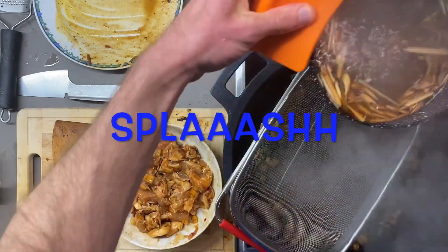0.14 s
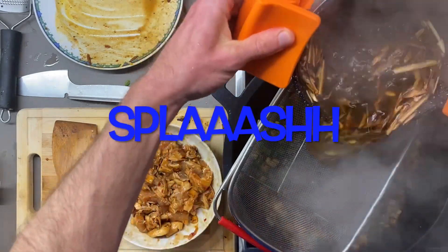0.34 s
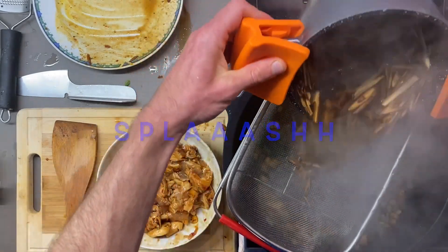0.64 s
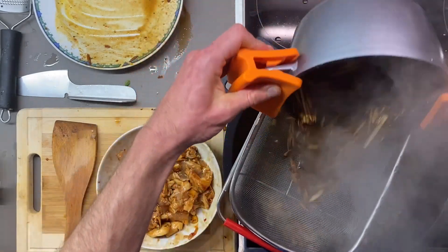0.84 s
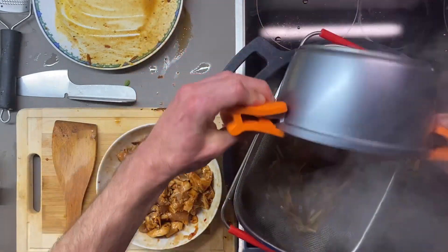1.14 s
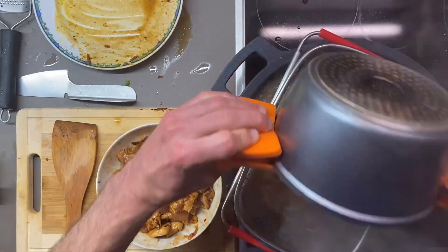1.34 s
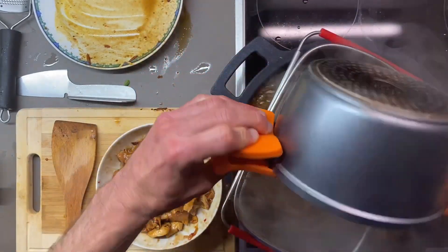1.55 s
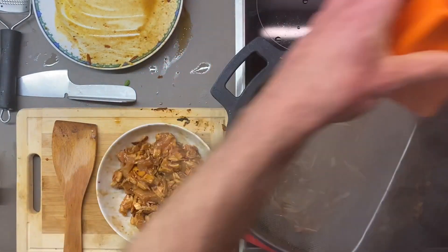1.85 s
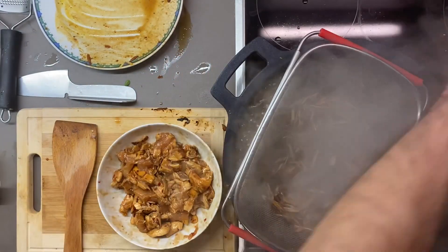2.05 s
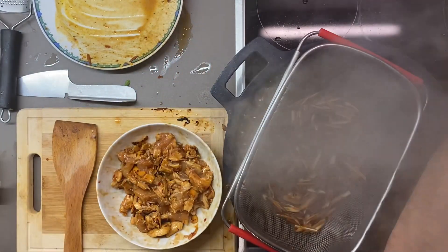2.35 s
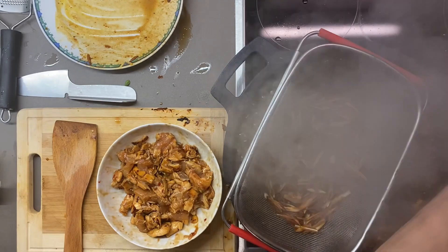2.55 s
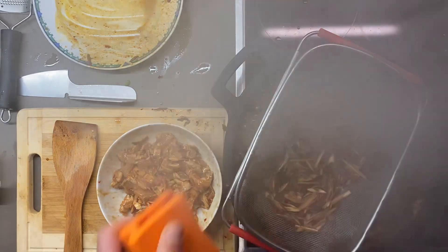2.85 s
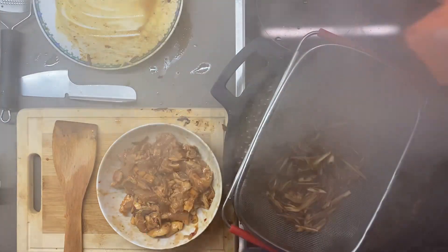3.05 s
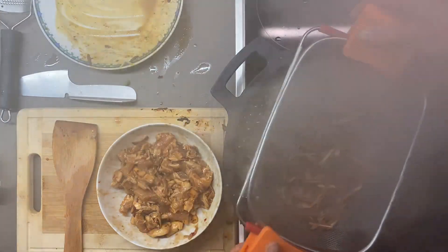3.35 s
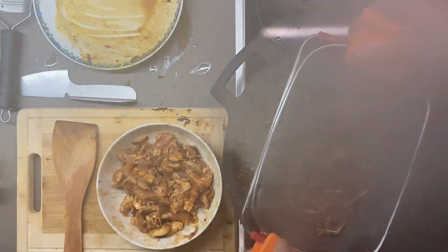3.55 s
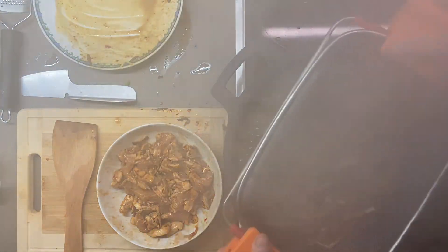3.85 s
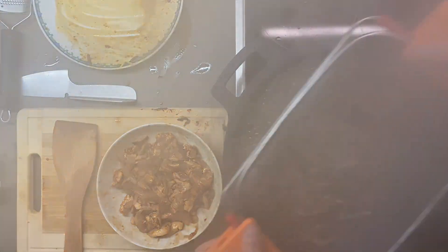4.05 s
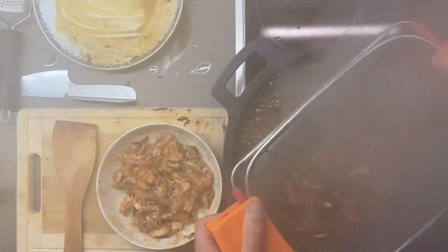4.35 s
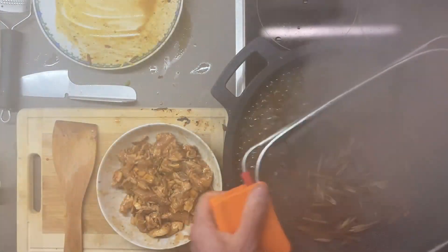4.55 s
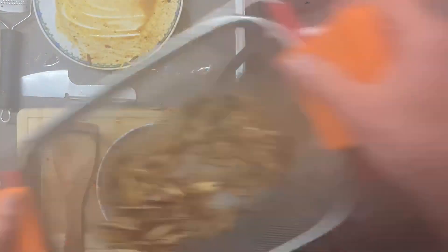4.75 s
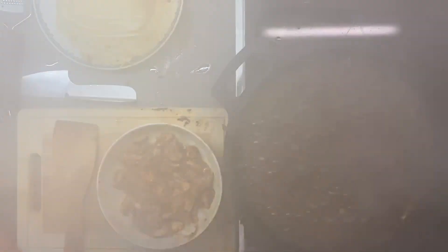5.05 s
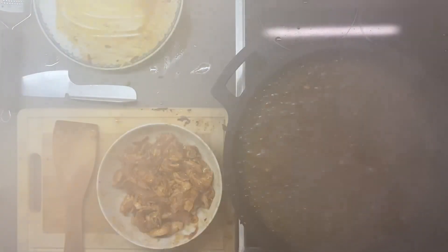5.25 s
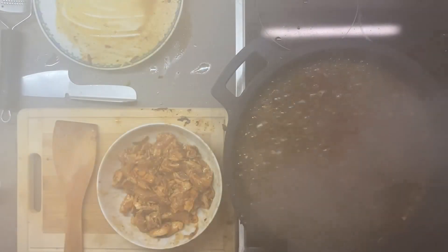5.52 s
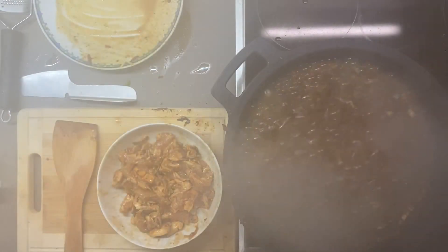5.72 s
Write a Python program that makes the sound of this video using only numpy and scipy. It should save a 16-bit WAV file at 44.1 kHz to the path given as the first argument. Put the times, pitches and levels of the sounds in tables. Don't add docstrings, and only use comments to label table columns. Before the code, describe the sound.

Loud steam hisses as hot broth pours through a strainer into a hot pan, fades to a low boil, then metal clatters on a bowl.

```python
import sys
import numpy as np
from scipy import signal
from scipy.fft import rfft, irfft, next_fast_len
from scipy.io import wavfile
from scipy.ndimage import uniform_filter1d

SR = 44100
rng = np.random.default_rng(int(sys.argv[2]) if len(sys.argv) > 2 else 0)


def undo_db(level):
    steps = np.asarray(level, float) / 20
    return 10 ** steps


def master_out(mix):
    frames = np.transpose(np.atleast_2d(mix))
    ceiling = np.clip(frames, -1, 1)
    pcm = np.round(ceiling * 32767).astype(np.int16)
    wavfile.write(sys.argv[1], SR, pcm)


N = 259352

# (time [s], level [dB])
PAN_HEAT = [(0.0, -32), (0.8, -33), (1.05, -35), (1.36, -37), (1.6, -41), (1.8, -45), (1.95, -48),
            (2.3, -50), (2.6, -49.5), (3.0, -52), (4.0, -53.5), (5.88, -51.5)]
# (frequency [Hz], density [dB per Hz])
STEAM_SPECTRUM = [(300, -14.5), (900, -18.5), (1800, -7), (3000, -3), (4200, -1), (5100, 0.5), (5800, -5),
                  (6500, -11), (7500, -6), (8700, -7), (10500, -8.5), (13500, -8), (15800, -13)]
# (frequency [Hz], density [dB per Hz])
BOIL_SPECTRUM = [(25, -40), (50, -20), (100, -5), (170, -8), (300, -3), (600, -8.5), (1000, -9), (1600, -9),
                 (2500, -12.5), (4000, -20), (8000, -53)]
# (frequency [Hz], width [Hz], gain [dB])
BODY_RESONANCES = [(86, 84, 1), (306.4, 35, -4.5), (830, 59, -3.5), (1080, 84, -5.5)]
# (frequency [Hz], width [Hz], gain [dB])
PAN_WALL_RESONANCE = (4870, 200, 20.6)
# (time [s], width [s], lift of trickle [dB], lift of boil [dB])
LAST_GUSH = (1.27, 0.45, 3.1, 1.75)
# (time [s], strength [1])
STRAINER_LANDINGS = [
    (5.24, 0.42),
    (5.5, 1.2),
    (5.67, 0.7),
    (5.83, 0.63),
]
# (time [s], peak [dB], centre [Hz])
DRIPS_AND_TICKS = [(2.511, -38, 11800), (2.759, -34.5, 2300), (2.834, -47, 9160), (2.885, -42, 4500),
                   (2.985, -49.5, 9690), (3.177, -39, 2800), (3.28, -36.5, 3470), (3.317, -44, 10300),
                   (3.348, -40, 10800), (3.697, -32.5, 1990), (3.787, -46, 10400), (3.9, -46, 3000),
                   (4.024, -30.5, 1100), (4.163, -40, 4870), (4.218, -42, 3800), (4.307, -48, 10100),
                   (4.545, -35, 1980), (4.926, -50, 9180), (5.036, -30.5, 1500), (5.144, -47, 10900),
                   (5.178, -40, 2500), (5.379, -28.5, 900), (5.396, -38, 2500), (5.416, -28.5, 1110)]
# (frequency [Hz], level [dB], t60 [s])
POT_MODES = [(382, -2, 0.056), (504, -10, 0.04), (686, -3, 0.037), (840, 0, 0.036), (1010, 2.5, 0.049),
             (1180, 0, .04), (1390, -3, .035), (1650, -2, .035), (1970, -5, .03), (2180, -12, .03),
             (4797, -13, .03)]
# (frequency [Hz], level [dB], t60 [s])
STRAINER_MODES = [(2250, -20, 0.088), (2430, -13, 0.056), (2630, 7, 0.075), (2890, 3, 0.082),
                  (3420, 4, 0.068), (3780, 0.5, .06), (4500, -12, .07), (4830, -1, 0.053), (5240, 2, 0.07),
                  (5760, -11, .06), (9000, -7, 0.044), (9900, -16, .05)]
# (frequency [Hz], level [dB], t60 [s])
BOWL_MODES = [(1890, -6.5, 0.24), (2156, -11, 0.18), (2690, -6, 0.11), (2915, -1.5, 0.08), (3050, -3, .07),
              (4005, -10, 0.066), (4360, -7, 0.077), (4620, -2, 0.073), (4700, -5, .08), (5240, -1, 0.082),
              (5180, -6, 0.073), (8130, -3, 0.084), (11200, -6, 0.055)]
# (frequency [Hz], level [dB], t60 [s])
LOADED_BOWL_MODES = [(1712, -4, 0.076), (1873, -11, 0.081), (2300, -6, 0.062), (2690, -6, 0.064),
                     (2957, 0, 0.06), (3140, 0.5, 0.076), (3900, -6, 0.08), (4250, -5, 0.072),
                     (4770, 1.5, 0.1), (5330, -6.5, 0.087), (5470, -10.5, 0.047), (8260, 1, 0.055),
                     (11300, -14, 0.044)]
# (frequency [Hz], level [dB], t60 [s])
COUNTER_MODES = [(88, -1, 0.26), (107.7, 0, 0.37), (137.8, 1.5, 0.18), (161, -6, 0.13), (197.4, -1, 0.27),
                 (226.7, -1, 0.17), (275, -6, 0.16), (353, -2.5, 0.13), (396, -6, 0.088),
                 (445, -12.5, 0.17)]
# (time [s], ring [dB], crack [dB], rattle length [s], crack tilt [dB per octave])
POT_CLASHES = [
    (2.4105, -32, -31.5, .001, -6.5),
    (2.4117, -29, -29.5, 0.0011, -6),
    (2.4135, -29.5, -29.5, .001, -7),
    (2.4155, -32, -30.5, .001, -8),
    (2.418, -29.5, -32, 0.0033, -9),
]
# (time [s], ring [dB], crack [dB], rattle length [s], crack tilt [dB per octave])
STRAINER_CLASHES = [
    (5.227, -21.5, -19, 0.016, 0.54),
    (5.239, -24.5, -28, 0.0097, .2),
]
# (time [s], ring [dB], crack [dB], rattle length [s], crack tilt [dB per octave])
BOWL_CLASHES = [
    (5.476, -23.5, -27.5, 0.022, 1.6),
    (5.514, -27, -28, 0.006, .3),
    (5.519, -21.5, -25, 0.013, .3),
    (5.531, -21, -21.5, 0.017, .3),
]
# (time [s], ring [dB], crack [dB], rattle length [s], crack tilt [dB per octave])
LOADED_BOWL_CLASHES = [
    (5.644, -35, -36, 0.025, -5),
    (5.671, -21.5, -23, 0.0092, 2),
    (5.688, -32, -23.5, 0.0115, .3),
    (5.706, -32, -29.5, 0.015, -3),
    (5.745, -41, -39, 0.015, -1),
    (5.786, -31.5, -36, .012, -6),
    (5.804, -28, -28, 0.0091, -3.5),
    (5.856, -42, -45, .012, .3),
]
# (time [s], level [dB], contact time [s])
COUNTER_THUDS = [(2.417, -18, 0.0034), (2.425, -11.5, 0.0043), (5.236, -20, 0.0044), (5.4917, -5.5, 0.0026),
                 (5.4963, -13, 0.0022), (5.503, -8, .004), (5.513, -10.5, 0.0049), (5.536, -22, .003),
                 (5.549, -20, 0.003), (5.654, -13, 0.0066), (5.666, -11.5, 0.0061), (5.677, -15.5, 0.0057),
                 (5.7, -17, 0.005), (5.714, -30, .004), (5.748, -20.5, 0.0035), (5.785, -26, 0.0042)]
# (time [s], frequency [Hz], level [dB], t60 [s])
SINGING_PARTIALS = [(2.432, 89.3, -25, 0.36), (5.5, 110, -14, 0.28), (5.5, 282, -26, 0.13),
                    (5.66, 111.8, -18, .3), (5.682, 197, -19, 0.38), (5.232, 3140, -35, .3),
                    (5.478, 4005, -20.5, .09), (5.512, 1080, -28.5, 0.39), (5.522, 754, -23.5, 0.17),
                    (5.52, 1890, -24, 0.1), (5.525, 5240, -30, 0.18), (5.674, 1650, -29, .15),
                    (5.682, 746, -25.5, 0.33), (5.69, 1067, -32.5, 0.28), (5.8, 2980, -36, .15)]
# (frequency [Hz], density [dB per Hz])
SHUDDER_SPECTRUM = [(20, -40), (30, -9), (50, 6.5), (70, 0.5), (100, 1), (140, -2.5), (200, -56),
                    (400, -60)]
# (time [s], level [dB])
WEIGHT_SHIFTS = [(.29, -54), (.83, -50), (1.3, -47), (1.65, -55), (2.13, -50), (2.45, -40), (2.77, -58),
                 (3.12, -50), (3.4, -38.5), (3.75, -48), (4.04, -49), (4.35, -44), (4.88, -51), (5.25, -38),
                 (5.55, -39), (5.82, -42)]
# (frequency [Hz], t60 [s])
KITCHEN_T60 = [(100, 0.33), (500, 0.64), (2000, 0.25), (6000, 0.33), (14000, 0.18)]
# (frequency [Hz], lead of left [rad], likeness [0-1], left minus right [dB])
PORT_PAIR = [(0, 0, 0.98, 5), (110, 0, 0.98, 0), (250, -0.34, 1, -1.4), (665, -0.5, 0.79, 1.5),
             (1700, 0.78, 0.68, -0.5), (2580, 0.7, 0.69, -1.5), (4400, 1.23, 0.9, -2),
             (5150, 0.05, 0.93, 0), (6060, 1.75, 0.5, 0), (6520, 2.5, 1, -2), (7216, 3, 0.96, -0.5),
             (10400, 6.5, .93, 0.5), (13800, 9, 1, -1), (15500, 12, 0.8, 0), (16700, 12.9, .9, 0)]
# (frequency [Hz], difference [dB])
LOST_UNDER = [(1500, 22), (2000, 15), (5500, 16), (6300, 7.5), (16000, 7.5)]


def pan():
    t = np.arange(N) / SR
    heat_db = np.interp(t, *np.transpose(PAN_HEAT))
    knee_db, share = -45, 0.56
    held_db = share * 10 * np.log10(1 + undo_db(2 * (heat_db - knee_db)))
    stir = stirring(t)
    return steam(heat_db, stir) + broth(t, heat_db, held_db, stir) + stove(t, held_db)


def steam(heat_db, stir):
    fizz = bubbles(1802, 11000, cycles=3, per_s=2393, spread_db=2, level_db=-6)
    bed = patchy_noise(1.0, 0.39, wide=6, long=10)
    sound = coloured(bed + fizz, lambda hz: read(STEAM_SPECTRUM, hz))
    hiss, top = split(evened(sound), 6500)
    hiss_db = heat_db + 3.0 + 5 * stir
    top_db = -24 + 1.263 * (heat_db + 32.5) + 12 * stir
    return hiss * undo_db(hiss_db) + top * undo_db(top_db)


def broth(t, heat_db, held_db, stir):
    gurgle = bubbles(306, 2798, cycles=5.5, per_s=700, spread_db=2, level_db=-9)
    bed = patchy_noise(1.25, 0.76, wide=3, long=12)
    body = [(hz, width, 7.5 + 0.5 * db) for hz, width, db in BODY_RESONANCES] + [PAN_WALL_RESONANCE]
    sound = coloured(bed + gurgle, lambda hz: read(BOIL_SPECTRUM, hz) + peaks(body, hz))
    boil, trickle = split(sound, 1370)
    gush_s, gush_width_s, trickle_lift_db, boil_lift_db = LAST_GUSH
    gush = bump(t, gush_s, gush_width_s)
    boil_db = -36.79 - held_db + boil_lift_db * gush + 3.4 * stir
    trickle_db = -36.2 + 0.56 * (heat_db + 32.5) - held_db + trickle_lift_db * gush + 4 * stir
    return evened(boil) * undo_db(boil_db) + evened(trickle) * undo_db(trickle_db)


def stirring(t):
    rise_s, fall_s = 0.025, 0.12
    total = np.zeros(len(t))
    for s, strength in STRAINER_LANDINGS:
        since = np.maximum(t - s, 0)
        total += strength * (1 - np.exp(-since / rise_s)) * np.exp(-since / fall_s)
    return total


def patchy_noise(patch_db, flicker_db, wide, long):
    frames = N // 256 + 5
    z = rng.standard_normal((frames, 257, 5)).T
    patches = evened(uniform_filter1d(uniform_filter1d(z[4], wide, 0), long, 1))
    flicker = evened(uniform_filter1d(rng.standard_normal(frames), size=3))
    spectra = (z[:2] + 1j * z[2:4]) * undo_db(patch_db * patches + flicker_db * flicker)
    noise = signal.istft(spectra, window="cosine", nperseg=512, noverlap=256)[1]
    return evened(noise[:, :N])


def bubbles(low_hz, high_hz, cycles, per_s, spread_db, level_db, count=600):
    draws = rng.random((20000, 3))[:int(per_s * N / SR)]
    hz = low_hz * (high_hz / low_hz) ** draws[:, 1:2]
    steps = np.arange(min(int(1.8 * cycles * SR / low_hz), count))
    turns = (steps * hz / SR).astype(np.float32)
    size = undo_db(-spread_db * np.log(draws[:, 2:] + 0.0049)) * hz
    rising = np.sin(2 * np.pi * turns * (1 + 0.045 * turns / cycles))
    chirps = size * rising * np.exp(-2 * turns / cycles)
    places = (draws[:, :1] * N).astype(int) + steps
    out = np.bincount(places.ravel(), chirps.ravel(), N)[:N]
    return undo_db(level_db) * evened(np.array([out, np.roll(out, N // 3)]))


def utensils():
    out = np.zeros(N)
    struck = ((POT_MODES, POT_CLASHES), (STRAINER_MODES, STRAINER_CLASHES),
              (BOWL_MODES, BOWL_CLASHES), (LOADED_BOWL_MODES, LOADED_BOWL_CLASHES))
    for modes, clashes in struck:
        response = ring(modes)
        for row in clashes:
            add(out, row[0], clash(response, *row[1:]))
    for source, rows in ((thud, COUNTER_THUDS), (sing, SINGING_PARTIALS), (tick, DRIPS_AND_TICKS)):
        for row in rows:
            add(out, row[0], source(*row[1:]))
    return out


def clash(response, ring_db, crack_db, length, tilt_db):
    t = np.arange(len(response)) / SR
    force = rng.standard_normal(len(t)) * undo_db(3.9 * rng.exponential(1, len(t)))
    contacts = force * (t < length) * np.exp(-t / length)
    rung = signal.fftconvolve(contacts, response)[:len(t)]
    hiss = rng.standard_normal(len(t)) * np.minimum(np.exp((length - t) / 0.0096), 1) * np.minimum(t / 0.0011, 1)
    crack = coloured(hiss, lambda hz: tilt_db * np.log2(np.maximum(hz, 500) / 3000)
                     + 0.6 * read(STEAM_SPECTRUM, hz))
    head = slice(0, SR // 50)
    return undo_db(ring_db) * rung / rung[head].std() + undo_db(crack_db) * crack / crack[head].std()


def ring(modes, pitch=1, sustain=1, loose_db=-5):
    t = np.arange(SR // 5, dtype=np.float32) / SR
    hz, db, t60 = np.transpose(modes)[:, :, None]
    loose = np.array([0, 1, 1])[:, None, None]
    detune = 1 + 0.031 * rng.standard_normal((3, len(modes), 1)) * loose
    fall = np.log(1000) / (np.clip(t60, 0.015, 0.5) * sustain * (1 - 0.4 * loose))
    size = undo_db(db + loose_db * loose)
    partials = size * np.exp(-fall * t) * np.sin(2 * np.pi * hz * pitch * detune * t)
    return partials.sum((0, 1)) * np.minimum((t[-1] - t) / 0.03, 1)


def thud(db, contact):
    push = np.hanning(int(0.46 * contact * SR) + 3)
    sustain = 0.57 + 0.02 * (db + 7)
    boom = signal.fftconvolve(push, ring(COUNTER_MODES, 1.009, sustain, loose_db=-15.0))
    boom = signal.sosfilt(signal.butter(2, 65, "high", fs=SR, output="sos"), boom)
    return undo_db(db) * boom / abs(boom).max()


def sing(hz, db, t60):
    t = np.arange(SR // 4) / SR
    drift = uniform_filter1d(uniform_filter1d(rng.standard_normal(len(t)), size=300), size=300)
    level_db = db + 3.9 * evened(drift) - 60 * t / t60
    return undo_db(level_db) * (1 - np.exp(-t / 0.0058)) * np.sin(2 * np.pi * hz * t)


def tick(db, hz):
    t = np.arange(1500) / SR

    def shape_db(f):
        octaves = np.log2((f + 50) / hz)
        return np.maximum(-9 * (octaves / 0.59) ** 2, -17.5 - 5.4 * abs(octaves))

    burst = coloured(rng.standard_normal(len(t)), shape_db)
    return undo_db(db - 0.5) * evened(burst) * np.exp(-t / 0.0087) * np.minimum(t / 0.00043, 1)


def stove(t, held_db):
    shudder = coloured(rng.standard_normal((2, N)), lambda hz: read(SHUDDER_SPECTRUM, hz))
    sway = undo_db(-48 - 1.5 * held_db)
    for s, db in WEIGHT_SHIFTS:
        sway += undo_db(db) * bump(t, s, 0.068)
    return evened(shudder) * sway


def kitchen(x):
    hz, t, z = signal.stft(rng.standard_normal((2, SR // 2)), SR, nperseg=128)
    tail = signal.istft(z * undo_db(-60 * t / read(KITCHEN_T60, hz)[:, None]), SR, nperseg=128)[1]
    tail = np.pad(tail, ((0, 0), (100, 0)))
    return signal.fftconvolve(x[None], tail / np.linalg.norm(tail[0]), axes=1)[:, :N]


def ports(shared, other):
    size = next_fast_len(N, True)
    f, *columns = np.transpose(PORT_PAIR)
    lead, alike, balance_db = (np.interp(np.fft.rfftfreq(size, 1 / SR), f, c) for c in columns)
    alike = np.clip(alike, 0, 1)
    left = rfft(shared, size)
    right = (alike * left + np.sqrt(1 - alike ** 2) * rfft(other, size)) * np.exp(-1j * lead)
    pair = np.array([left * undo_db(balance_db / 2), right * undo_db(-balance_db / 2)])
    return irfft(pair, size)[:, :N]


def thin_stereo(x, shift=382, size=32):
    frame = dict(window="cosine", nperseg=2048, noverlap=1024)
    pair = np.pad(np.array([x[0] + x[1], x[0] - x[1]]) / 2, ((0, 0), (shift, 0)))
    hz, _, z = signal.stft(pair, SR, **frame)
    power = (abs(z[:, :1024]) ** 2).reshape(2, -1, size, z.shape[2]).sum(2)
    under_db = read(LOST_UNDER, hz[size // 2:1024:size])[:, None]
    margin = undo_db(2 * under_db + 3.5 * rng.standard_normal(power.shape))
    z[:, :1024] *= np.repeat(power * margin > power[::-1], size, axis=1)
    z[1] *= (hz ** 2 / (hz ** 2 + 120 ** 2))[:, None]
    mid, side = signal.istft(z, SR, **frame)[1][:, shift:shift + N]
    return np.array([mid + side, mid - side])


def evened(x):
    return x / np.sqrt(np.mean(abs(x) ** 2) + 1e-20)


def read(points, hz):
    f, value = np.transpose(points)
    return np.interp(np.log(hz + 1), np.log(f + 1), value)


def add(mix, s, sound):
    part = mix[round(s * SR):][:len(sound)]
    part += sound[:len(part)]


def coloured(x, db_of_hz):
    length = x.shape[-1]
    size = next_fast_len(length, True)
    gain = undo_db(db_of_hz(np.fft.rfftfreq(size, 1 / SR)))
    return irfft(rfft(x, size) * gain, size)[..., :length]


def split(x, hz, order=8):
    lower = coloured(x, lambda f: -20 * np.log10(1 + (f / hz) ** order))
    return lower, x - lower


def peaks(rows, hz):
    return sum(db / (1 + (2 * (hz - f) / w) ** 2) for f, w, db in rows)


def bump(t, s, width):
    return np.exp(-((t - s) / width) ** 2)


def scene():
    hiss, other_hiss = pan()
    hits = utensils()
    near, far = kitchen(hits)
    return ports(hiss + hits + undo_db(-9.5) * near, other_hiss + undo_db(-5.0) * far)


def low_pass(x):
    return signal.sosfilt(signal.butter(12, 17110, fs=SR, output="sos"), x)


def record(dry):
    edge = signal.firwin(301, 15850, window=("kaiser", 9), fs=SR)
    limited = signal.oaconvolve(dry, edge[None], "same", axes=1)
    bass_cut = signal.butter(4, 42, "high", fs=SR, output="sos")
    mix = thin_stereo(signal.sosfilt(bass_cut, limited))
    return low_pass(mix)


dry = scene()
out = record(dry)
master_out(out)
```